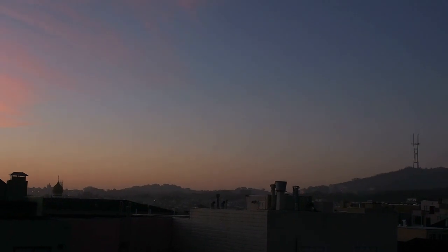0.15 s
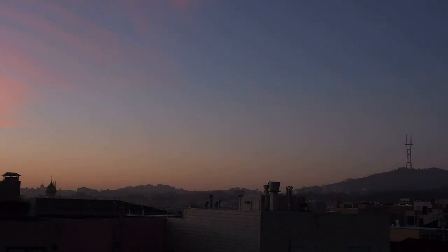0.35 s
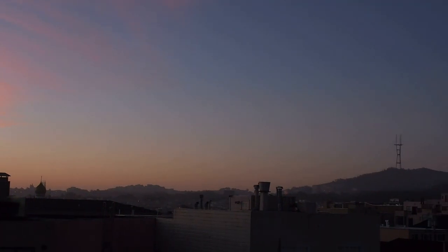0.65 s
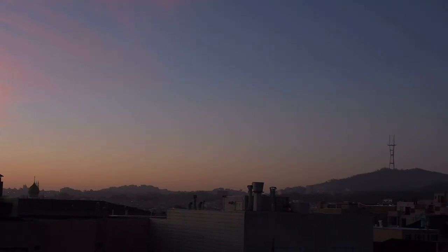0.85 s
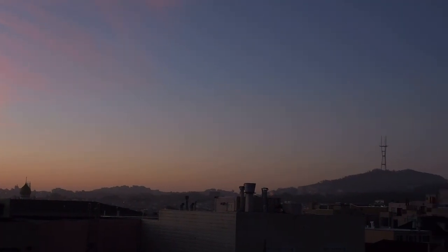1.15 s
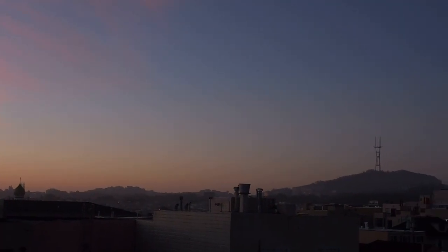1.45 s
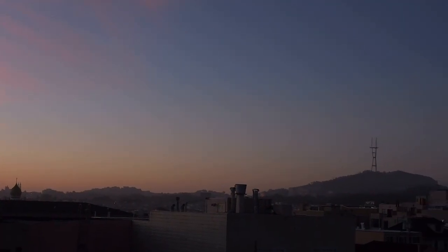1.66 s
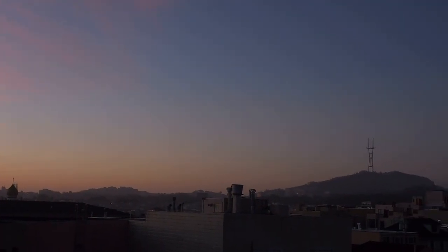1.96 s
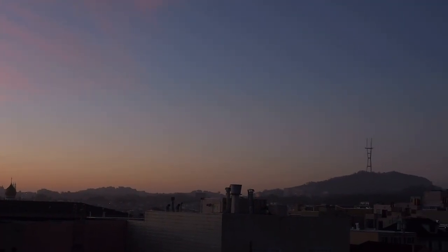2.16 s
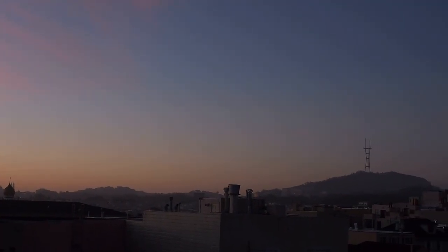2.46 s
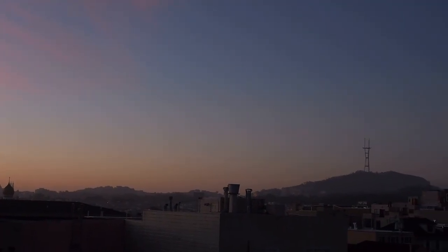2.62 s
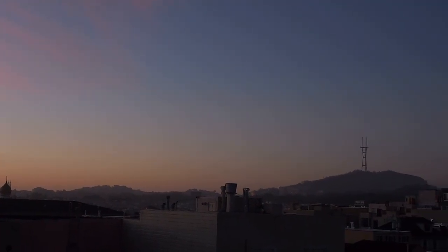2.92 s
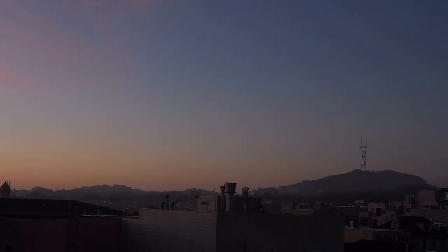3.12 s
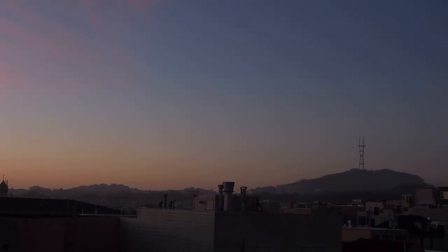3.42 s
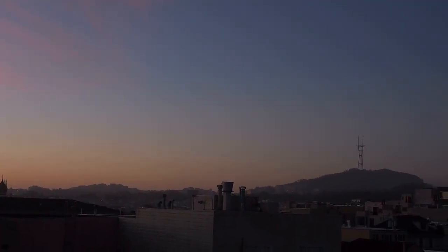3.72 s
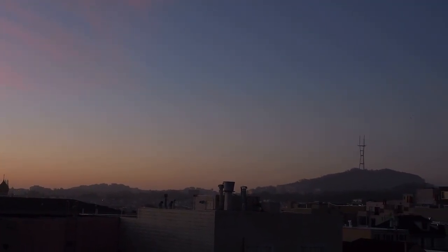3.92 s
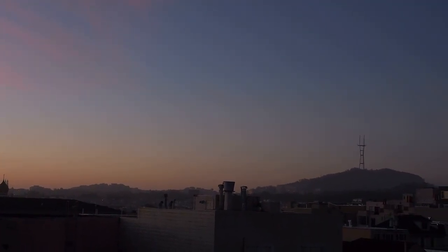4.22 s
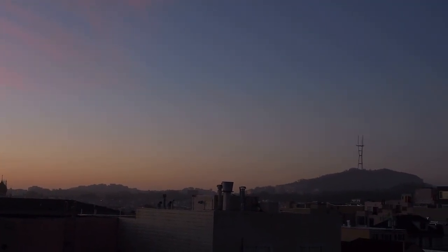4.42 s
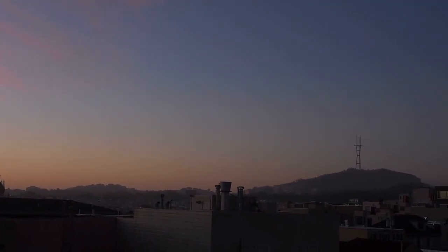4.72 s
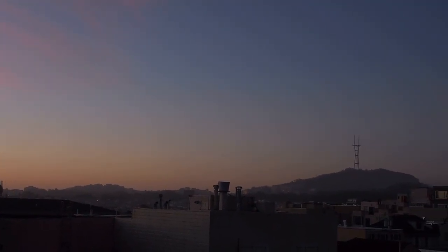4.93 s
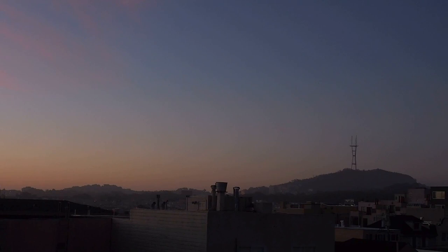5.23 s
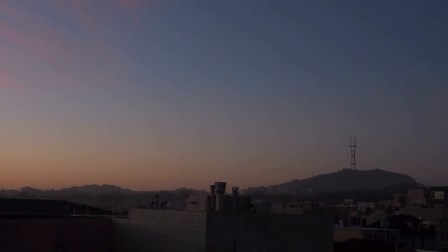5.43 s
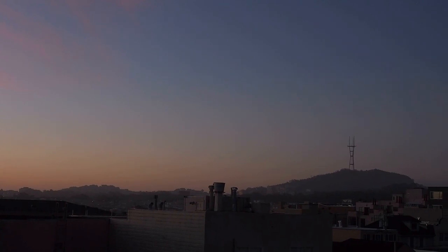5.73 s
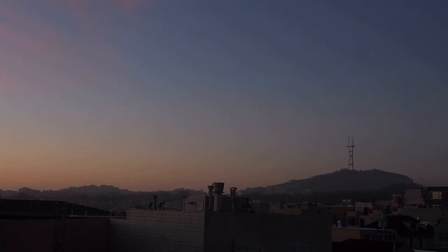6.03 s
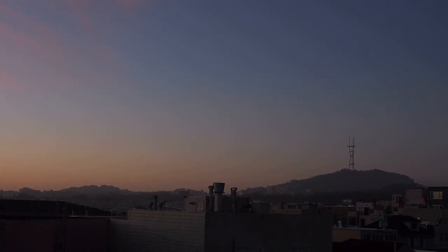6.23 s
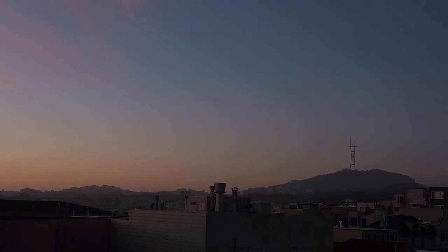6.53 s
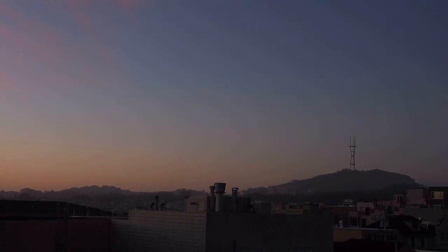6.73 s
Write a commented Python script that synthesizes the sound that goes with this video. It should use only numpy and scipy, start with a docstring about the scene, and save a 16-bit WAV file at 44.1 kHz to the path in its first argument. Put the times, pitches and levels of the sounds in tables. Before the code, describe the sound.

A steady low hum of distant traffic with a faint airy hiss surrounds a city rooftop throughout, heard in stereo. Far engines swell gently out of it in the first second and a half and again around 5 seconds. At the very start a nearby thrush, just left, gives a quick rising whistle with a fizzy edge. A sparrow close on the left makes single high metallic chips at about 0.2, 1.2, 3.1, 4.3, 5.6 and 6.6 seconds, loudest at 5.6. The thrush sings five quick arching notes from 2.5 to 3.2 seconds, then four buzzy falling notes from 4.4 to 5. Faint far chips and chatter are scattered between, with a soft twitter on the right from 3.7 to 4.3 seconds. Thin, faint rasps come around 5.5 seconds. The birds' notes echo lightly off the surrounding house walls.

```python
"""Dawn on a city rooftop.

A thrush sings two short phrases, a sparrow chips close by on the left, and smaller birds answer from
farther off. Each note is a gliding near-sine from the syrinx, thrown back to the stereo microphones by
house walls. Thin rasps come near the end; distant traffic hums all around, engines swelling out of it."""
import sys
import numpy as np
from scipy import signal
from scipy.fft import rfft, irfft
from scipy.io import wavfile
from scipy.ndimage import map_coordinates

SR = 44100
rng = np.random.default_rng(int(sys.argv[2]) if len(sys.argv) > 2 else 0)


def transcribe(signal):
    """Save signal, clipped to [-1, 1], as a 16-bit WAV file at the path in sys.argv[1]."""
    frames = np.atleast_2d(signal).T
    limited = np.clip(frames, -1, 1)
    pcm = np.round(limited * 32767).astype(np.int16)
    wavfile.write(sys.argv[1], SR, pcm)


N = 302967
LEAD_S = .25  # bird tracks start early, so echoes already ring at t = 0


def gain_of(db):
    """Decibels to amplitude."""
    return 10 ** (np.asarray(db) / 20)


def pan(db):
    """Left and right gains for a level difference, left minus right."""
    return gain_of(db * np.array([[.5], [-.5]]))


def unit_rms(x):
    """Scales to an rms of one."""
    return x / np.sqrt(np.mean(x ** 2) + 1e-20)


def curve_at(points, hz):
    """Interpolates a table on a log-frequency axis."""
    f, value = np.transpose(points)
    return np.interp(np.log(hz + 1), np.log(f + 1), value)


def wander(length, rate_hz):
    """Smooth random drift of rms one, not much faster than the rate."""
    hz = np.fft.rfftfreq(length, 1 / SR)
    return unit_rms(irfft(rfft(rng.standard_normal(length)) * np.exp(-(hz / rate_hz) ** 2), length))


def bell(t, top_s, half_s):
    """A smooth swell and fade of height one."""
    return np.exp(-((t - top_s) / half_s) ** 2)


def add(track, start_s, sound):
    """Adds a sound to a track that begins LEAD_S early."""
    part = track[max(round((start_s + LEAD_S) * SR), 0):][:len(sound)]
    part += sound[:len(part)]


def wash(spectrum, db):
    """Noise from all around: alike at both microphones in the bass, largely unrelated in the treble."""
    # likeness of the two channels: f/Hz, correlation
    likeness = [(60, 1), (130, 0.98), (290, 0.94), (640, 0.82), (1410, 0.37), (3100, -0.46), (6820, -0.21),
                (15000, 0.085)]
    # lean to the left: f/Hz, left minus right/dB
    tilt = [(60, 3.6), (110, 2.5), (200, 2.7), (380, 2.5), (700, 3), (1290, 1.6), (2380, 1.5), (4400, 0.5),
            (8120, 1.7), (15000, 0.5)]
    hz = np.fft.rfftfreq(N, 1 / SR)
    left, unrelated = rfft(rng.standard_normal((2, N)))
    same = curve_at(likeness, hz)
    right = same * left + np.sqrt(1 - same ** 2) * unrelated
    colour = gain_of(curve_at(spectrum, hz)) * pan(curve_at(tilt, hz))
    return gain_of(db) * unit_rms(irfft(np.array([left, right]) * colour, N))


def city():
    """The steady hum of distant traffic under a faint airy hiss."""
    # spectra of the hum and the hiss: f/Hz, relative level/dB
    traffic = [(20, -39), (34, -11.5), (53, -15), (118, -2.5), (152, -5.5), (226, -1.5), (262, -5),
               (299, -4), (378, -9.5), (554, -10), (602, -9.5), (710, -10.5), (1080, -14), (1380, -21.5),
               (1800, -24), (2340, -71), (3960, -120)]
    air = [(880, -26), (1500, -14.5), (1860, -5), (2260, -7.5), (2570, -7), (3270, -7.5), (3870, -8),
           (4560, -8), (5280, -9.5), (6740, -16), (7660, -13.5), (8360, -18), (15500, -26)]
    return wash(traffic, db=-41.5) + wash(air, db=-55.5)


def engines(waver_hz=3, pan_db=3.0):
    """Far engines: wavering low tones rise out of the traffic and sink back."""
    # swells: peak t/s, f/Hz, level/dB, half length/s
    drones = [(0, 407, -52, 0.96), (0.095, 230, -46, 0.28), (1.015, 228, -47.5, 0.26),
              (1.494, 298, -46, 0.12), (4.5, 297, -56.5, 2.2), (5.165, 209.5, -42.5, 0.14),
              (6.59, 215, -49, .4)]
    t, out = np.arange(N) / SR, np.zeros(N)
    for top_s, hz, db, half_s in drones:
        cycles = np.cumsum(hz + waver_hz * wander(N, 12.1)) / SR
        out += gain_of(db) * bell(t, top_s, half_s) * np.sqrt(2) * np.sin(2 * np.pi * cycles)
    return out * pan(pan_db)


def glide(length_s, start_hz, turn_hz, end_hz, turn_s, bend, attack_s, release_s):
    """Base pitch and envelope of a note that swings to a turn and away (bend 1 straight, 2 rounded)."""
    t = np.arange(0, length_s, 1 / SR)
    before = np.maximum(1 - t / turn_s, 0)
    after = np.maximum(t - turn_s, 0) / (length_s - turn_s)
    hz = turn_hz + (start_hz - turn_hz) * before ** bend + (end_hz - turn_hz) * after ** bend
    release = np.sin(np.pi / 2 * np.minimum((length_s - t) / release_s, 1)) ** 2
    return hz, np.minimum(t / attack_s, 1) * release


def syrinx(shape, pitch, second_db=-35, third_db=-45, jitter=.0048, buzz_hz=300, buzz_depth=0,
           hiss_db=-60):
    """One note: a near-sine that glides and flutters, with two weak overtones and a little hiss."""
    hz, envelope = shape
    flutter_hz = buzz_hz * (1 + .14 * wander(len(hz), 74))
    flutter = np.sin(2 * np.pi * np.cumsum(flutter_hz) / SR)
    hz = hz * pitch * (1 + jitter * wander(len(hz), 526) + buzz_depth * flutter)
    phase = 2 * np.pi * np.cumsum(hz) / SR
    tone = np.sin(phase) + gain_of(second_db) * np.sin(2 * phase) + gain_of(third_db) * np.sin(3 * phase)
    turbulence = gain_of(hiss_db) * wander(len(hz), 2900) * np.sin(2 * phase)  # chopped by the membrane
    throb = 1 + 5 * buzz_depth * flutter  # the flutter also pumps the loudness
    return np.sqrt(2) * envelope * throb * (tone + turbulence)


def scatter(onset_s, t60, per_s):
    """Dying reflections of energy one, different at each microphone."""
    t = np.arange(round(1.3 * SR)) / SR
    taps = rng.choice([-1., 1.], (2, len(t))) * (rng.random((2, len(t))) < per_s / SR)
    tail = taps * gain_of(-60 * t / t60) * np.clip(t / onset_s - .5, 0, 1)
    return tail / np.linalg.norm(tail, axis=1, keepdims=True)


def street(walls, near_db, near_t60, far_db, far_t60, far_per_s=4000):
    """Echoes of single walls, scatter from the nearest roofs, and the long tail of the streets."""
    response = gain_of(near_db) * scatter(.0083, near_t60, per_s=6000)
    response += gain_of(far_db) * scatter(.04, far_t60, far_per_s)
    for delay_s, db in walls:
        response[[0, 1], round(abs(delay_s) * SR) + rng.integers(0, 12, 2)] += gain_of(db)
    hz, t, spectra = signal.stft(response, SR, nperseg=256)
    air_loss = gain_of(-t * (hz[:, None] / 3000) ** 2)  # the air takes the treble on long paths
    return signal.istft(spectra * air_loss, SR, nperseg=256)[1]


def perch(notes, shape, space, pan_db, lag_ms, trim_db=0, wet_db=0, wet_pan_db=.5, turning=0, **voice):
    """Notes from one perch: the direct path, lag_ms later at the left microphone, plus the echoes."""
    size = N + round(LEAD_S * SR)
    direct, to_walls = np.zeros((2, size))
    mean_db = np.mean(notes, axis=0)[1]
    for start_s, db, pitch in notes:
        note = gain_of(db + trim_db) * syrinx(shape, pitch, **voice)
        add(direct, start_s, note)
        send_db = wet_db + turning * (mean_db - db)  # a turned head weakens the echoes less
        add(to_walls, start_s, note * gain_of(send_db))
    late = map_coordinates(direct, [np.arange(size) - lag_ms * SR / 1000], order=3)
    echoes = signal.fftconvolve(to_walls[None], space, axes=1)[:, :size]
    return (np.array([late, direct]) * pan(pan_db) + echoes * pan(wet_pan_db))[:, -N:]


def paired(notes, after_s, db):
    """A companion to each note, a set time and level apart."""
    return np.array(notes) + [after_s, db, 0]


def thrush(pan_db=2.5):
    """Near, just left: graced upslurs, five arch-and-pip syllables, four buzzes sung toward the walls."""
    # the song's notes: t/s, relative level/dB, pitch factor
    upslur_notes = [(-.12, -27, 1.02), (.058, -29.5, 1.0)]
    syllables = [(2.479, -28, 1.038), (2.642, -25.5, 1.02), (2.809, -24, 1.01), (2.971, -23.5, 1.005),
                 (3.144, -24, 1)]
    buzz_notes = [(4.374, -32, 0.96), (4.549, -31.5, 0.96), (4.719, -32.5, 0.95), (4.911, -31, 0.97)]
    # wall echoes: delay/s, level/dB
    walls = [(.003, -11.5), (.008, -25), (.035, -22), (.054, -12)]
    grace = glide(.032, 2446, 2163, 2400, turn_s=.024, bend=1.06, attack_s=.013, release_s=.005)
    upslur = glide(.056, 2595, 3558, 3480, turn_s=.043, bend=.65, attack_s=.002, release_s=.019)
    arch = glide(.045, 2916, 3323, 1827, turn_s=.018, bend=1.7, attack_s=.02, release_s=.014)
    pip = glide(.036, 2297, 2557, 2520, turn_s=.0309, bend=1.72, attack_s=.011, release_s=.021)
    buzz = glide(.105, 2904, 3075, 2233, turn_s=.0056, bend=.85, attack_s=.0074, release_s=.079)
    space = street(walls, near_db=-4, near_t60=.2, far_db=-6, far_t60=1.55)
    graces = perch(paired(upslur_notes, after_s=-.026, db=-13.5), grace, space, pan_db, lag_ms=.072,
                   wet_db=8, jitter=.026)
    upslurs = perch(upslur_notes, upslur, space, pan_db, lag_ms=.072, trim_db=-2, wet_db=2.5,
                    wet_pan_db=1, second_db=-32, third_db=-33, jitter=.025, hiss_db=-17)
    arches = perch(syllables, arch, space, pan_db, lag_ms=.096, trim_db=-.5, wet_db=-4,
                   second_db=-25, third_db=-55, jitter=.011, hiss_db=-32)
    pips = perch(paired(syllables, after_s=.053, db=-1), pip, space, pan_db, lag_ms=.092,
                 trim_db=-2, wet_db=2.5, second_db=-45, third_db=-32.5, jitter=.029, hiss_db=-35)
    buzzes = perch(buzz_notes, buzz, space, pan_db=2, lag_ms=.069, wet_db=7.5,
                   second_db=-29.5, third_db=-35.5, jitter=.019, buzz_hz=286, buzz_depth=.045)
    return graces + upslurs + arches + pips + buzzes


def fizz_and_rasps(centre_hz=7700, width_hz=1500, roughness=.33):
    """Stuttering high noise: a fizz of overtones on the thrush's upslur, thin scratchy calls later."""
    # the fizz, then the rasps: peak t/s, level/dB, half length/s
    bursts = [(0.11, -46.5, .02), (5.485, -58.5, 0.2), (5.603, -57, 0.033), (5.705, -59, 0.015)]
    hz = np.fft.rfftfreq(N, 1 / SR)
    band = irfft(rfft(rng.standard_normal((2, N))) / (1 + ((hz - centre_hz) / width_hz) ** 4), N)
    envelope = sum(gain_of(db) * bell(np.arange(N) / SR, top_s, half_s) for top_s, db, half_s in bursts)
    stutter = np.exp(roughness * wander(N, 70))
    return envelope * unit_rms(band * stutter)


def sparrow():
    """Close on the left: metallic chips, each a quick dip in pitch, sent back by far house fronts."""
    # chips: t/s, relative level/dB, pitch factor
    notes = [(0.2424, -28.5, 0.99), (1.1646, -33, 1.0), (3.1089, -26, 1.0), (4.3354, -23.5, 1.0),
             (5.5678, -21, 1.0), (6.5804, -34.5, 0.99)]
    # wall echoes: delay/s, level/dB
    walls = [(.012, -15), (.017, -15), (.024, -16), (.042, -19), (.11, -28), (.186, -32), (.268, -38)]
    chip = glide(.0426, 5610, 4762, 5076, turn_s=.0225, bend=2.01, attack_s=.0074, release_s=.0075)
    space = street(walls, near_db=-9.5, near_t60=.25, far_db=-19, far_t60=4.5, far_per_s=120)
    return perch(notes, chip, space, pan_db=11, lag_ms=.13, trim_db=-4, wet_db=3, wet_pan_db=2,
                 turning=.83, second_db=-30.5, third_db=-58, jitter=.0042)


def far_birds_and_echoes():
    """Faint far chips, late sparrow echoes, slurs and a twitter to the right; flicks and chatter left."""
    # far chips and, at .68 and 3.295 s, the near sparrow's echoes: t/s, relative level/dB, pitch factor
    chips_and_echoes = [(.58, -54.5, 1.0), (.68, -54, 1.0), (1.728, -53, 1.04), (2.388, -52, 1.04),
                        (2.714, -49, 1.01), (3.295, -53, 1.0), (3.642, -50.5, .99), (5.17, -51.5, 1.01),
                        (6.078, -49.5, 0.99)]
    # far birds' notes: t/s, relative level/dB, pitch factor
    slur_notes = [(1.578, -53.5, 1), (1.58, -55, 0.82), (3.656, -47.5, 0.98)]
    flick_notes = [(.712, -54.5, 1.55), (1.931, -53, .61), (4.583, -50, 1.14), (5.63, -49, .76),
                   (6.165, -52, 1.08)]
    chip = glide(.036, 5460, 4784, 5080, turn_s=.0234, bend=2.09, attack_s=.0061, release_s=.0079)
    slur = glide(.056, 3550, 4110, 3170, turn_s=.025, bend=.99, attack_s=.013, release_s=.019)
    flick = glide(.026, 5300, 5220, 3210, turn_s=.0019, bend=1.04, attack_s=.0035, release_s=.0072)
    space = street([], near_db=-9, near_t60=.18, far_db=-10, far_t60=1.8)
    chips = perch(chips_and_echoes, chip, space, pan_db=-2, lag_ms=.054, trim_db=-1, wet_db=-4,
                  wet_pan_db=-4, second_db=-21)
    slurs = perch(slur_notes, slur, space, pan_db=-3, lag_ms=.052, trim_db=-2.5, jitter=.017)
    flicks = perch(flick_notes, flick, space, pan_db=8.5, lag_ms=0, trim_db=-9.5, wet_db=5, jitter=.02)
    return chips + twitter(space) + chatter(space) + slurs + flicks


def chatter(space, count=6, from_s=.78, to_s=1.35, db=-62, pitch_spread=.199):
    """A distant bird on the left drops faint falling notes at loose times and pitches."""
    fall = glide(.05, 3000, 2950, 2140, turn_s=.0037, bend=.92, attack_s=.014, release_s=.028)
    slips, pitch_draws = rng.random((count, 2)).T
    starts = from_s + (to_s - from_s) * (np.arange(count) + slips) / count
    notes = [(s, db, 1 + pitch_spread * (2 * draw - 1)) for s, draw in zip(starts, pitch_draws)]
    return perch(notes, fall, space, pan_db=6, lag_ms=.065, jitter=.025)


def twitter(space, count=7, from_s=3.713, step_s=.0828, top_db=-44.5):
    """An even run on the right that swells and fades; each syllable is a rising wheeze and a tick."""
    wheeze = glide(.038, 5200, 5950, 5870, turn_s=.0335, bend=1.12, attack_s=.011, release_s=.01)
    tick = glide(.021, 4330, 5270, 3860, turn_s=.0078, bend=1.12, attack_s=.0097, release_s=.0076)
    starts = from_s + step_s * np.arange(count)
    run = [(s, top_db + 20 * np.log10(bell(s, top_s=3.93, half_s=.3)), 1) for s in starts]
    wheezes = perch(run, wheeze, space, pan_db=-4, lag_ms=.07, trim_db=-7, wet_db=-1.5,
                    wet_pan_db=3, jitter=.035)
    ticks = perch(paired(run, after_s=.042, db=-2.5), tick, space, pan_db=-6.5, lag_ms=.071,
                  wet_db=-1, wet_pan_db=-2, jitter=.018)
    return wheezes + ticks


def scene():
    """Birds near and far over the hum of the city, heard from the roof."""
    return city() + engines() + thrush() + sparrow() + far_birds_and_echoes() + fizz_and_rasps()


def record(dry):
    """The recorder's band limit: a steep low-pass."""
    lowpass = signal.firwin(1023, cutoff=15680, window=("kaiser", 9), fs=SR)
    return signal.oaconvolve(dry, lowpass[None], "same")


dry = scene()
out = record(dry)
transcribe(out)
```